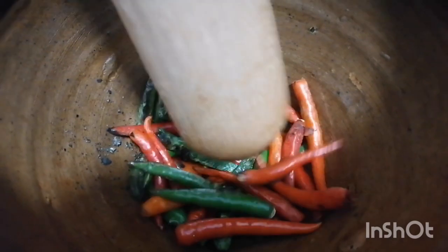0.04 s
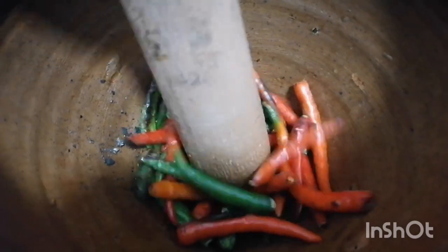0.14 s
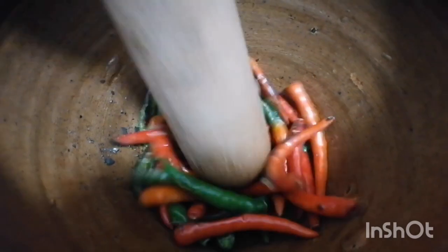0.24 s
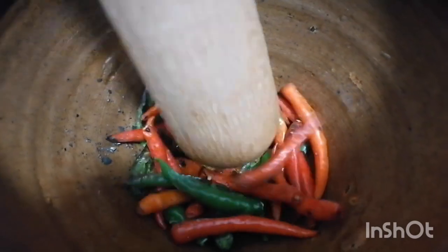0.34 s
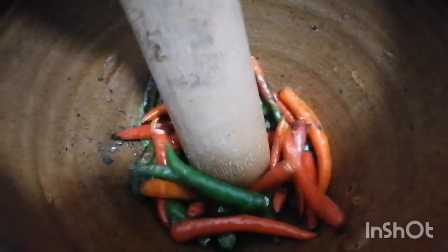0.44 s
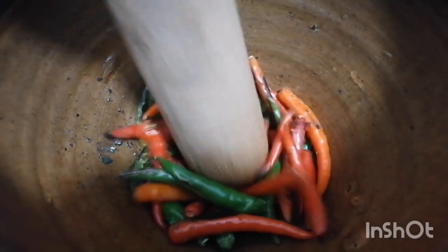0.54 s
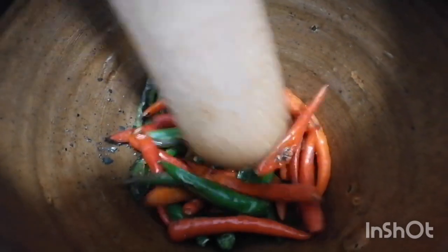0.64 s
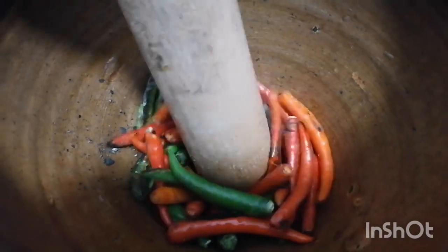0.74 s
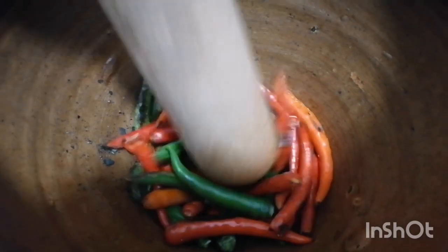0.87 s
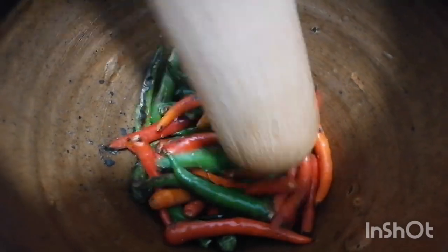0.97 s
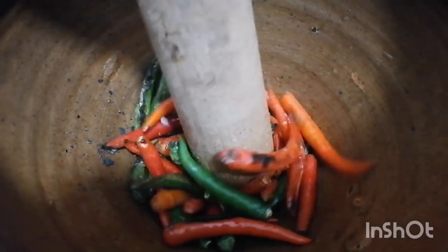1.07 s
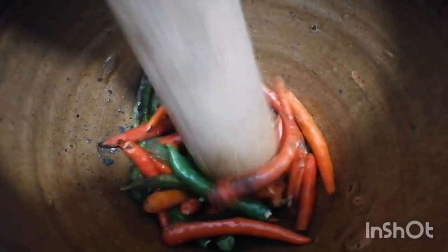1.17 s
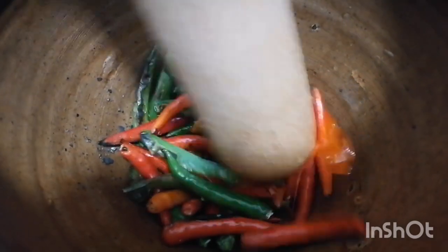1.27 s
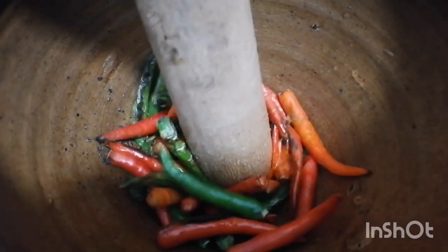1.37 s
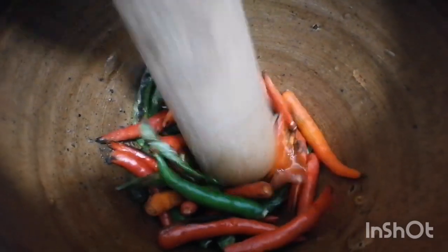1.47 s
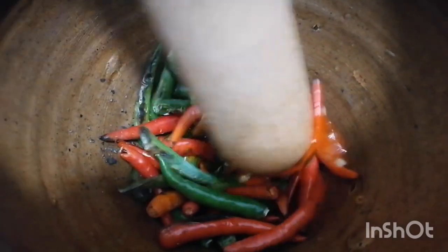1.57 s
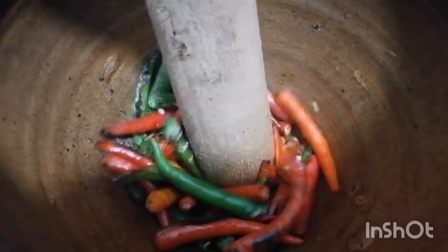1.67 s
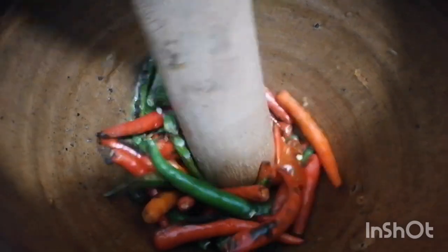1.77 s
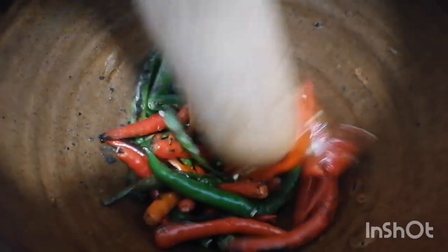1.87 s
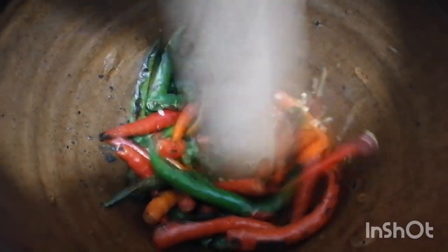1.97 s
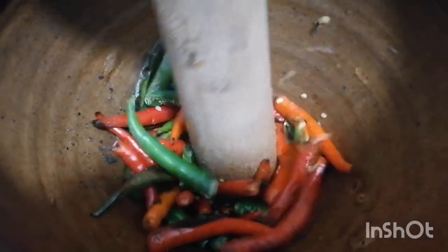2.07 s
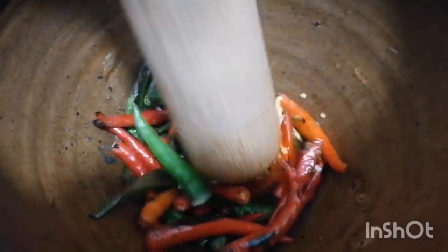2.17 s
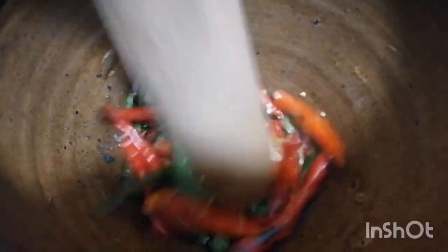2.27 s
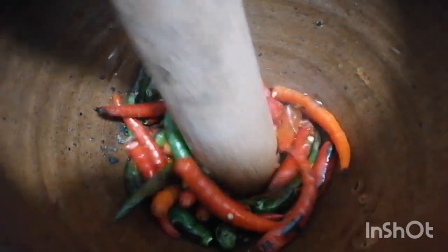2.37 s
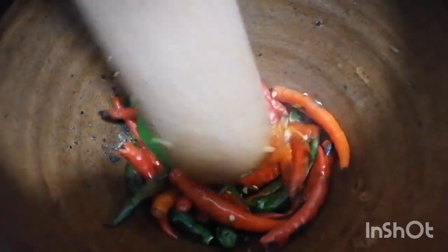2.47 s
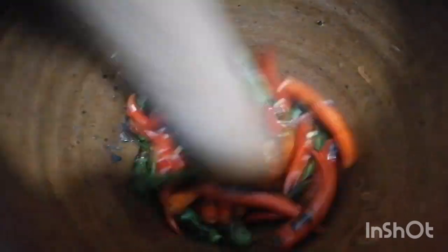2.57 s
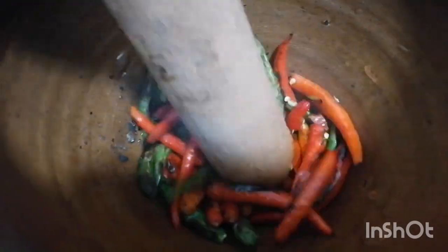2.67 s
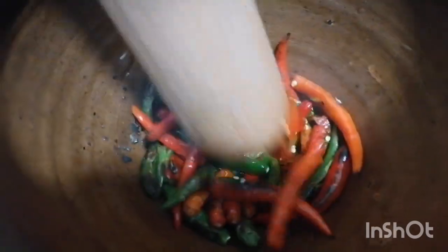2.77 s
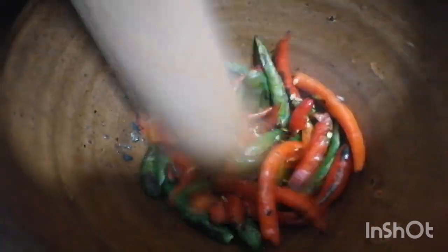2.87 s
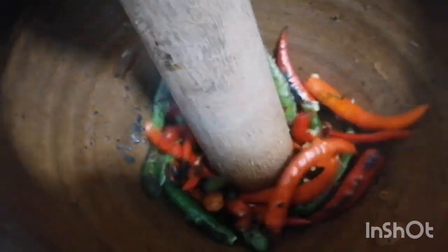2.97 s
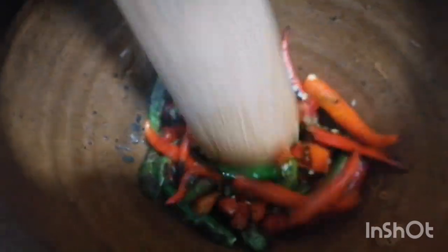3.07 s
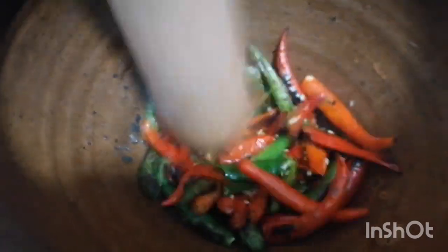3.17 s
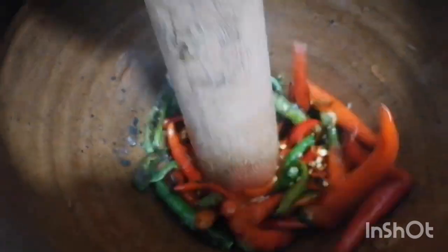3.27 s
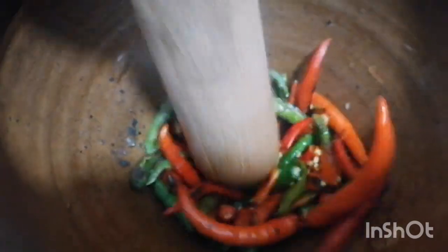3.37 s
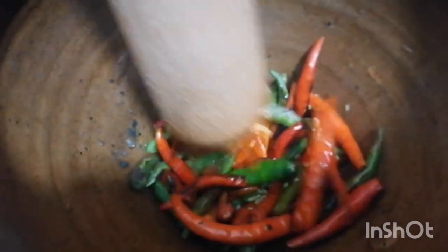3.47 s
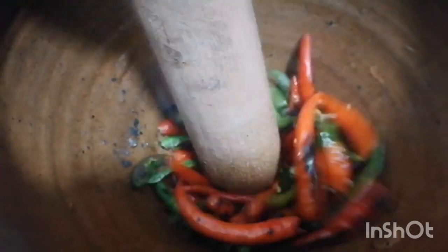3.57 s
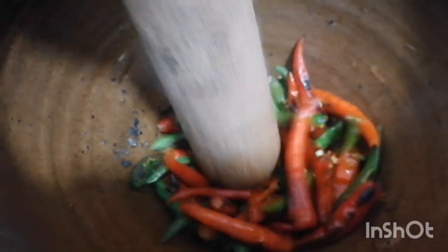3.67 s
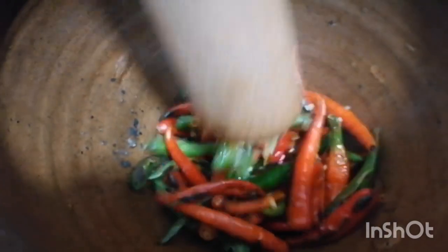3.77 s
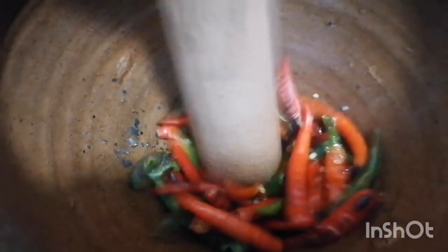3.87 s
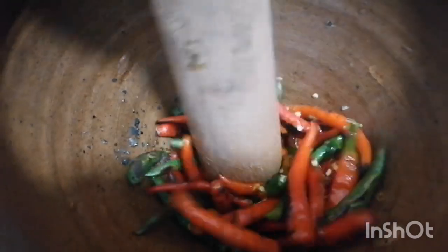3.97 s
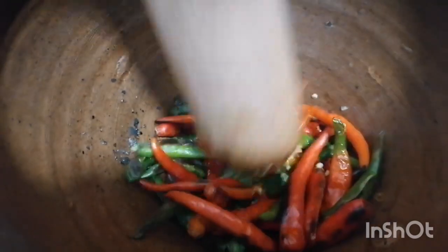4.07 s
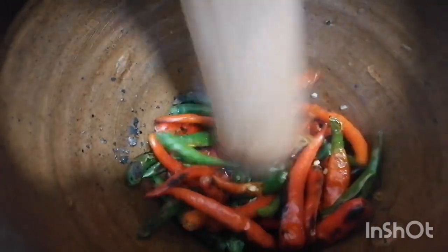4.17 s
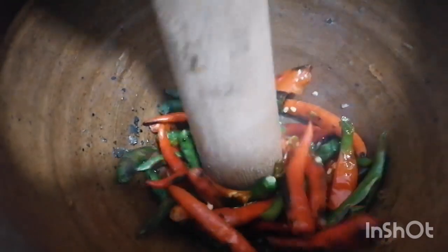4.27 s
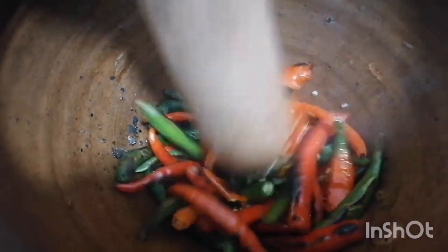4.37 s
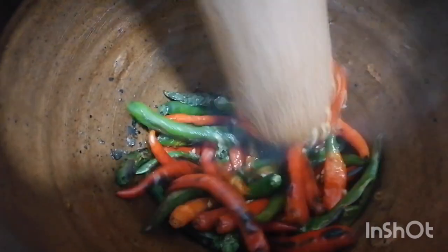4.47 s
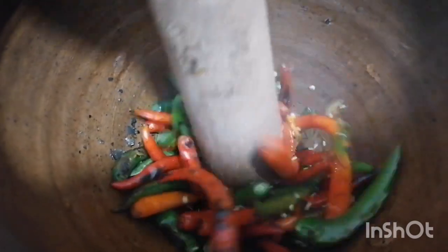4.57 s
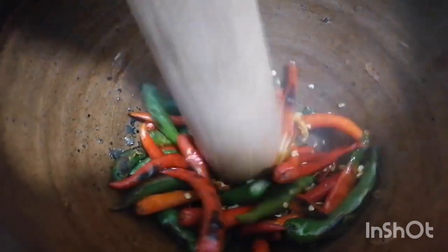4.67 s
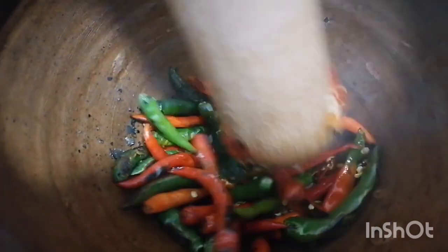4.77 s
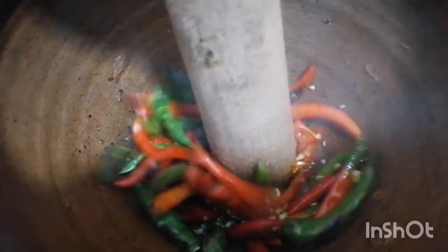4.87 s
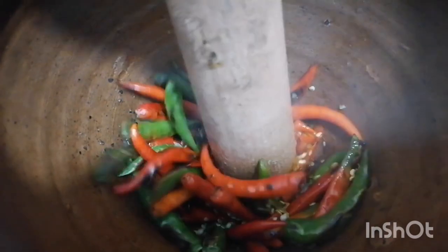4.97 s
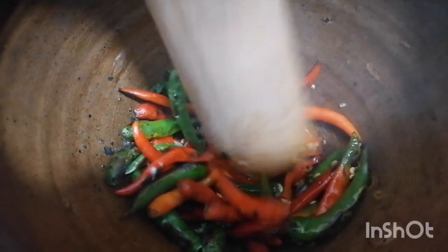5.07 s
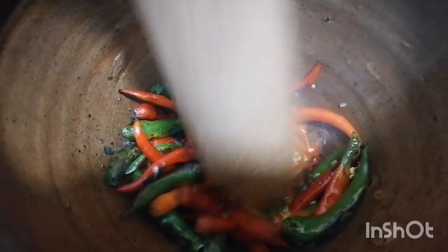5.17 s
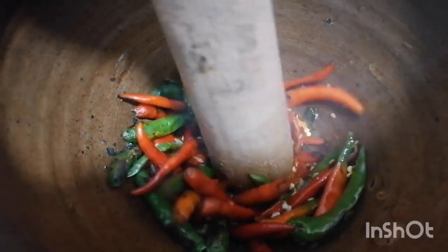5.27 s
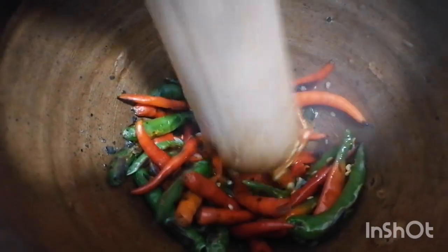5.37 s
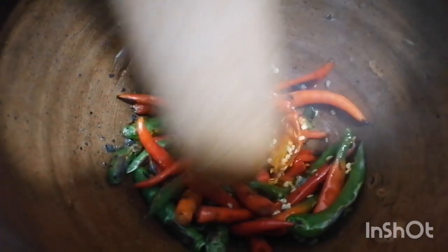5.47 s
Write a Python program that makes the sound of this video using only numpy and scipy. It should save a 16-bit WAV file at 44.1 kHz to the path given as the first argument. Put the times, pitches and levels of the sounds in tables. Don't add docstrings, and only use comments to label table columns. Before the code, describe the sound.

Close up in a home kitchen, a wooden pestle pounds fresh chillies in a clay mortar, roughly three strokes a second. Each begins with skins splitting, bursts into a wet, gritty crunch, and lands with a short hollow knock and soft thud. Occasional sharp pops stand out. Low floor hum and faint hiss fill the gaps; the knock leans strongly left.

```python
import sys
import numpy as np
from scipy import signal
from scipy.fft import rfft, irfft, next_fast_len
from scipy.io import wavfile
from scipy.ndimage import uniform_filter1d, map_coordinates

SR = 44100
rng = np.random.default_rng(int(sys.argv[2]) if len(sys.argv) > 2 else 0)


def inscribe(sig):
    pcm = np.round(np.clip(np.atleast_2d(sig).T, -1, 1) * 32767)
    wavfile.write(sys.argv[1], SR, pcm.astype(np.int16))


def undo_db(level):
    steps = np.asarray(level, float) / 20
    return 10 ** steps


N = 243564
GRID = next_fast_len(N)


def rms_one(x):
    return x / np.sqrt(np.mean(x ** 2) + 1e-20)


def at_hz(points):
    hz = np.maximum(np.arange(GRID // 2 + 1) * SR / GRID, 1)
    points = np.array(points)
    return np.interp(np.log(hz), np.log(np.maximum(points[:, 0], 1)), points[:, 1])


def two_ports(shared, other, spectrum, balance, alike):
    alike = np.clip(alike, -1, 1)
    mid = np.sqrt(1 + alike) * rfft(shared, GRID)
    side = np.sqrt(1 - alike) * rfft(other, GRID)
    gain, tilt = undo_db(at_hz(spectrum)), undo_db(at_hz(balance) / 2)
    left, right = gain * tilt * (mid + side), gain / tilt * (mid - side)
    return rms_one(irfft([left, right], GRID)[:, :N])


def ring(x, hz, t60):
    r, w = undo_db(-60 / (max(t60, .003) * SR)), 2 * np.pi * hz / SR
    return signal.lfilter([0, np.sin(w)], [1, -2 * r * np.cos(w), r * r], x + 1e-18)


def drift(hz, count):
    r = np.exp(-80 * np.pi * hz / SR)
    noise = rng.standard_normal((count, N // 40 + 2002))
    slow = signal.lfilter([1], [1, -2 * r, r * r], noise)[:, 2000:]
    return np.array([np.interp(np.arange(N) / 40, np.arange(len(v)), rms_one(v)) for v in slow])


# (frequency [Hz], density [dB per Hz])
RUMBLE_SPECTRUM = [(12, -42), (20, -13), (139, -6), (162, -4), (182, -2.5), (244, -16.5), (280, -11),
                   (332, -18), (1200, -16.5), (1560, -53), (2640, -120)]
# (frequency [Hz], density [dB per Hz])
HISS_SPECTRUM = [(710, -47), (1200, -25.5), (1570, -1.5), (1660, -7.5), (1950, -11), (2120, -14.5),
                 (2460, -6), (2680, -7), (4450, -15.5), (5170, -6.5), (6980, 2.5), (8110, -7.5),
                 (10600, -9.5), (11800, -4), (15600, -14.5)]
# (frequency [Hz], balance [dB])
HISS_BALANCE = [(60, -2), (110, 12), (200, -1), (380, 7), (700, -1), (1290, 3.5), (2380, -12), (4400, -6),
                (8120, -4), (15000, -13.5)]
# (frequency [Hz], correlation [-1 to 1])
HISS_LIKENESS = [(60, 0.95), (240, 1), (950, 0.017), (3770, 0.52), (15000, -0.5)]


def hiss():
    white = rng.standard_normal((2, 2, N))
    alike = at_hz(HISS_LIKENESS)
    rumble = two_ports(*white[0], RUMBLE_SPECTRUM, HISS_BALANCE, alike)
    top = two_ports(*white[1], HISS_SPECTRUM, HISS_BALANCE, alike)
    rumble_db = -59.86 + 3.04 * drift(6.2, count=1)
    top_db = -57.6 + 0.74 * drift(5.6, count=1)
    return undo_db(rumble_db) * rumble + undo_db(top_db) * top


# (frequency [Hz], width [Hz])
HUM_MODES = [
    (223.3, 27),
    (179.4, 10.7),
    (132, 54),
]
# (time [s], thud [dB], upper hum [dB], middle hum [dB], lower hum [dB])
FLOOR_HITS = [(0.204, -38, -75, -60, -57), (0.504, -37.5, -45, -62, -46), (0.813, -34.5, -60, -48, -48),
              (1.117, -38, -72, -58, -60), (1.431, -37, -42, -50, -55), (1.739, -32, -51, -43, -48),
              (2.056, -35.5, -52, -56, -53), (2.383, -34, -41, -42, -53), (2.705, -38, -50, -65, -43),
              (3.025, -41, -47, -37, -48), (3.338, -35, -50, -56, -53), (3.66, -46.5, -75, -47, -51),
              (3.965, -38, -56, -66, -62), (4.293, -44, -66, -70, -52), (4.611, -28, -64, -50, -53),
              (4.959, -37, -45, -40, -55), (5.292, -33, -38, -45, -44)]
# (upper [s], middle [s], lower [s])
HUM_SWELL_S = [0.03, 0.1, 0.04]
# (upper [dB/s], middle [dB/s], lower [dB/s])
HUM_FADE_DB_PER_S = [130, 55, 85]
# (upper [dB], middle [dB], lower [dB])
HUM_AT_START_DB = [-71, -58, -66]


def hum():
    hz, wander_hz = np.transpose(HUM_MODES)[:, :, None]
    phase = 2 * np.pi * np.cumsum(hz + .18 * wander_hz * drift(8, count=3), axis=1) / SR
    strokes = np.array([(0, 0, *HUM_AT_START_DB)] + FLOOR_HITS)
    t = np.arange(N) / SR
    last = strokes[np.searchsorted(strokes[:, 0], t, side="right") - 1].T
    gain = undo_db(last[2:] - np.outer(HUM_FADE_DB_PER_S, t - last[0]))
    poles = np.exp(-2 / SR / np.array(HUM_SWELL_S))
    gain = [signal.lfilter([1 - r], [1, -r], g) for g, r in zip(gain, poles)]
    return sum(g * np.sin(p + [[0], [1.4]]) for g, p in zip(gain, phase))


# (time of most force [s], crunch [dB], settling [dB], low share [dB], left-right [dB])
CRUSHES = [(-0.1, -30.0, -40.0, -3.0, -6.0), (0.196, -32.5, -44.5, -4.5, -8.0),
           (0.502, -36.5, -44.0, -3.5, -3.0), (0.802, -31.0, -47.0, -6.0, -4.0),
           (1.121, -38.0, -51.0, -6.0, -2.0), (1.434, -35.0, -50.0, -4.5, -1.0),
           (1.744, -36.5, -47.5, -3.0, -4.0), (2.055, -33.0, -47.0, -4.0, -5.0),
           (2.377, -33.5, -49.5, -7.0, -5.0), (2.69, -34.0, -53.5, -3.5, -7.0),
           (3.014, -32.0, -53.0, -4.5, -4.0), (3.326, -35.0, -50.5, -8.5, -3.0),
           (3.648, -38.0, -57.0, -5.0, -6.0), (3.96, -33.5, -43.5, -7.0, -4.0),
           (4.295, -35.0, -49.0, -5.0, -3.0), (4.621, -32.5, -47.0, -8.0, -2.0),
           (4.942, -44.0, -46.5, -8.0, -4.0), (5.272, -35.0, -45.5, -4.0, -3.0)]


def crushing():
    rise, fall, settle = 750, 450, 100
    s, peak_db, settle_db, low_db, pan_db = np.transpose(CRUSHES)[:, :, None]
    ticks = np.arange(0, N + 32, 32)
    before, after = np.minimum(ticks / SR - s, 0), np.maximum(ticks / SR - s, 0)
    blow = undo_db(peak_db + rise * before - fall * after) ** 2
    pulp = undo_db(settle_db + rise * before - settle * after) ** 2
    total = (blow + pulp).sum(axis=0) + 1e-12
    low = (blow * low_db + pulp * -4.6).sum(axis=0) / total
    top = (blow * -9.5 + pulp * -16).sum(axis=0) / total
    pan = (blow * pan_db + pulp * (pan_db - 1)).sum(axis=0) / total
    level = 10 * np.log10(total + undo_db(-65) ** 2)
    return [np.interp(np.arange(N), ticks, c) for c in (level, low, top, pan)]


# (time [s], peak [dB], swell before it [s], low share [dB], top share [dB])
LANDINGS = [(0.181, -25.0, 0.0076, -7.0, -4.5), (0.4823, -22.0, 0.0091, -4.0, -2.5),
            (0.7835, -28.5, 0.0077, -10.5, 0.5), (1.1087, -29.0, 0.0279, -7.5, -9.0),
            (1.4205, -26.5, 0.0185, -4.5, -11.5), (1.7314, -26.0, 0.0192, -11.5, -8.0),
            (2.0388, -25.0, 0.0108, -3.0, -6.5), (2.3676, -22.0, 0.0257, -6.5, -6.5),
            (2.6697, -26.0, 0.0312, -8.0, -12.5), (2.9911, -20.5, 0.022, -12.0, -14.0),
            (3.3042, -24.5, 0.02, -5.0, -2.0), (3.6235, -26.5, 0.0145, -13.5, -14.0),
            (3.9463, -31.0, 0.0097, -6.0, -8.0), (4.2792, -24.5, 0.0197, -9.5, -16.5),
            (4.6032, -24.0, 0.0182, -10.5, -5.5), (4.9461, -16.5, 0.0092, -12.0, -18.0),
            (5.2652, -25.0, 0.0063, -4.5, -14.5)]
# (time [s], peak [dB], spray t60 [s], low share [dB], top share [dB])
BURSTS = [(0.1974, -9.0, 0.022, -5.0, -13.5), (0.4985, -11.0, 0.02, -3.5, -7.5),
          (0.8068, -10.0, 0.021, -8.0, -8.0), (1.1237, -13.0, 0.025, -5.5, -19.0),
          (1.4357, -14.0, 0.026, -9.5, -19.5), (1.7463, -16.0, 0.048, -5.5, -7.5),
          (2.0572, -15.5, 0.046, -4.0, -13.0), (2.3792, -10.0, 0.027, -9.5, -8.5),
          (2.6986, -17.5, 0.054, -8.5, -16.5), (3.0168, -14.0, 0.044, -10.5, -11.5),
          (3.3134, -23.5, 0.115, -9.0, -16.5), (3.6476, -21.5, 0.093, -8.5, -22.0),
          (3.9682, -19.0, 0.099, -2.0, -9.0), (4.2976, -14.0, 0.038, -9.5, -22.5),
          (4.6289, -9.5, 0.024, -9.0, -17.5), (4.9577, -18.0, 0.1, -8.0, -19.0),
          (5.278, -13.5, 0.093, -4.5, -15.5), (5.2974, -26.0, 0.024, -13.0, -14.0)]
# (time [s], peak [dB], low share [dB])
POPS = [(0.4985, -17, 0), (0.8036, -21, 0), (1.1233, -28, 0), (1.4361, -22, -9.5), (2.379, -26, -3),
        (2.6577, -24, -6), (3.3274, -21, -9), (3.634, -14, -6), (3.9729, -10.5, -5), (4.2829, -17, -13),
        (4.6279, -26, -3), (5.2765, -22, -2)]


def skin_breaks():
    power = np.zeros((3, N))
    t = np.arange(-SR // 10, SR // 10) / SR
    breaks = [(s, db, swell, 0.07, low, top) for s, db, swell, low, top in LANDINGS]
    breaks += [(s, db, 0.008, *rest) for s, db, *rest in BURSTS]
    breaks += [(s, db, 0.0021, 0.011, low, -10) for s, db, low in POPS]
    for s, peak_db, swell, t60, low_db, top_db in breaks:
        swell_db = -2.5 + 20 * t / max(swell, .0005)
        fall_db = np.where(t < 0, swell_db, -60 * t / max(t60, .003))
        share_db = np.array([[0], [min(low_db, 0)], [top_db]])
        span = slice(round(s * SR) - SR // 10, round(s * SR) + SR // 10)
        power[:, span] += undo_db(peak_db - 14.5 + fall_db + share_db) ** 2
    return power


def fibre_grains(grains_per_s=6000, spread_db=3.5, wet_share=0.48):
    height_db = spread_db * np.minimum(rng.exponential(1, (2, N)), 3)
    snaps = undo_db(height_db) * rng.choice([-1, 1], (2, N))
    snaps = rms_one(snaps * (rng.random((2, N)) < grains_per_s / SR))
    grains = snaps + wet_share * rng.standard_normal((2, N))
    grains /= np.sqrt(uniform_filter1d(grains ** 2, size=220))
    grains[0, [round(pop[0] * SR) + 12 for pop in POPS]] = 6.5
    return grains


# (frequency [Hz], density [dB per Hz])
CRUNCH_SPECTRUM = [(180, -15), (300, -2), (540, 3.6), (850, -9), (1500, -3.5), (2400, 0.5), (3100, 4),
                   (4200, 0), (5300, 3), (7000, 4.55), (8600, -10), (10300, -13), (13000, -12),
                   (15000, -26.5), (15800, -12.5)]
# (frequency [Hz], balance [dB])
CRUNCH_BALANCE = [(60, 27), (110, 11), (200, 21), (380, 12.5), (700, 13), (1290, 8), (2380, 7.5),
                  (4400, -1.5), (8120, 1.5), (15000, 2.5)]


def crunch():
    level, low_db, top_db, pan_db = crushing()
    power = undo_db(level - 4 + np.array([0 * low_db, low_db, top_db])) ** 2
    whole, low_power, top_power = power + skin_breaks()
    both = two_ports(*fibre_grains(), CRUNCH_SPECTRUM, CRUNCH_BALANCE, alike=0.5)
    lag = SR * 0.0001 * (1 + 0.33 * drift(1.22, count=1))
    both[1] = map_coordinates(both[1], np.arange(N) - lag, order=3)
    edges = np.geomspace(250, 17000, 15)
    patches = undo_db(1.3 * drift(50, count=14))
    bands = []
    for patch, *edge in zip(patches, edges, edges[1:]):
        bands.append(patch * signal.sosfilt(signal.butter(2, edge, "band", fs=SR, output="sos"), both))
    hollow, low, high, top = [rms_one(sum(b)) for b in np.split(np.array(bands), [4, 9, 12])]
    mix = undo_db(3.2) * np.sqrt(low_power) * low
    mix = mix + np.sqrt(np.maximum(whole - low_power, 0.13 * whole)) * high
    mix = mix + undo_db(2.4) * np.sqrt(top_power) * top
    mix = mix + undo_db(-10) * np.sqrt(whole) * hollow
    return undo_db(7.2) * mix * undo_db(np.clip(pan_db + 1.5, -8, 8) * [[.5], [-.5]])


# (time [s], peak [dB], bowl pitch [Hz], ring t60 [s], lower modes [dB])
KNOCKS = [(0.204, -19.5, 530, 0.041, -8.5), (0.504, -16, 541, 0.05, -5), (0.806, -22.5, 494, 0.033, 3),
          (0.813, -20, 540, 0.031, -4), (1.117, -26, 433, 0.026, -18), (1.125, -25.5, 504, 0.025, 8),
          (1.431, -22, 466, 0.031, -1), (1.437, -22.5, 580, 0.056, 5), (1.739, -18, 508, 0.053, -12.5),
          (2.046, -29.5, 453, 0.022, -8), (2.056, -20, 519, 0.039, -10), (2.383, -20.5, 493, 0.037, -10),
          (2.705, -19, 523, 0.047, -6), (3.025, -13.5, 541, 0.034, -13), (3.338, -25.5, 518, 0.031, -12),
          (3.66, -18.5, 512, 0.022, -24), (3.965, -26, 495, 0.024, -23), (4.293, -23, 477, 0.044, -8),
          (4.297, -23, 530, 0.048, -4.5), (4.611, -18.5, 515, 0.029, -14), (4.959, -22.5, 435, 0.021, 2),
          (4.972, -31, 495, 0.044, 8), (5.289, -18, 472, 0.024, -4), (5.298, -20.5, 496, 0.036, -7)]
# (pitch ratio, level [dB], t60 ratio)
BOWL_MODES = [
    (0.994, 10.5, 0.66),
    (1.043, -2.5, 1),
    (0.707, 6, 0.35),
    (0.62, -3, 1),
]
# (frequency [Hz], level [dB], t60 [s])
FLOOR_MODES = [(176.3, -11.5, 1), (210.8, -8.5, 0.65), (268, -10, 0.39), (357, -14, 0.78), (419, -16, 0.9),
               (477.5, -10, 0.46), (519, -16.5, 1)]


def knocks(contact_s=0.0018, mouth_hz=260):
    bowl, floor = np.zeros(N + SR), np.zeros((len(FLOOR_MODES), N))
    chance = rng.normal(0, 1, (len(KNOCKS), len(BOWL_MODES) + len(FLOOR_MODES)))
    push, t = np.zeros(SR // 4), np.arange(SR // 4) / SR
    width = max(int(contact_s * SR), 4)
    push[:width] = np.hanning(width) / width * 2
    small = signal.butter(2, mouth_hz, "high", fs=SR, output="sos")
    floor[:, 0] = undo_db(-43)
    for (s, peak_db, hz, t60, lower_db), luck in zip(KNOCKS, chance):
        clay = 0
        for (ratio, db, share), luck_db in zip(BOWL_MODES, luck):
            mode_db = db + lower_db * (ratio < .9) + luck_db
            clay = clay + undo_db(mode_db) * ring(push, hz * ratio, 2.7 * t60 * share)
        air = signal.sosfilt(small, ring(clay, hz, 0.0041))
        air *= np.exp(-(t / (0.52 * t60)) ** 2)
        i = round((s - .0006) * SR)
        bowl[i:i + len(t)] += undo_db(peak_db + 8.0) * air / np.abs(air).max()
        floor[:, i] = undo_db(peak_db - 25 + 2.96 * luck[len(BOWL_MODES):]) * np.sign(luck[0] + 1)
    rocking = undo_db(5.5 * drift(16, count=len(floor)))
    shake = np.zeros(N)
    for (hz, db, t60), clicks, waver in zip(FLOOR_MODES, floor, rocking):
        shake += undo_db(db) * waver * ring(clicks, hz, t60)
    shake = signal.sosfilt(signal.butter(2, [140, 700], "band", fs=SR, output="sos"), shake)
    return bowl[:N], shake


def thuds():
    push = np.zeros(N)
    for s, thud_db, *_ in FLOOR_HITS:
        push[round((s + .0003) * SR)] = undo_db(thud_db)
    return ring(ring(push, 87, 0.041), 73, 0.028) / 90


def kitchen(x, t60_s=0.44, wall_cut_hz=9000):
    out, dull = np.zeros((2, N)), np.exp(-2 * np.pi * wall_cut_hz / SR)
    for k, lag in enumerate((rng.uniform(0.013, 0.041, 16) * SR).astype(int)):
        loop, gain, state = x[k % 2].copy(), undo_db(-60 * lag / SR / t60_s), [0.]
        for i in range(lag, N, lag):
            back, state = signal.lfilter([gain * (1 - dull)], [1, -dull], loop[i - lag:i], zi=state)
            loop[i:i + lag] += back[:N - i]
        out[k % 2] += (loop - x[k % 2]) * (-1) ** (k // 2)
    return out


def scene():
    bowl, shake = knocks()
    pods = crunch()
    room = kitchen(undo_db(-29) * bowl + undo_db(-31) * pods)
    low = shake * undo_db([[1.5], [-1.5]]) + hum() * undo_db([[.7], [-.7]]) + thuds() * undo_db([[4], [-9]])
    return bowl * undo_db([[0.1], [-15]]) + pods + low + room + hiss()


def roll_off(x):
    return signal.sosfilt(signal.butter(12, 15760, fs=SR, output="sos"), x)


def record(dry):
    top = signal.ellip(10, .5, 90, 15660, fs=SR, output="sos")
    mix = signal.sosfilt(top, dry)
    return roll_off(mix)


dry = scene()
out = record(dry)
inscribe(out)
```